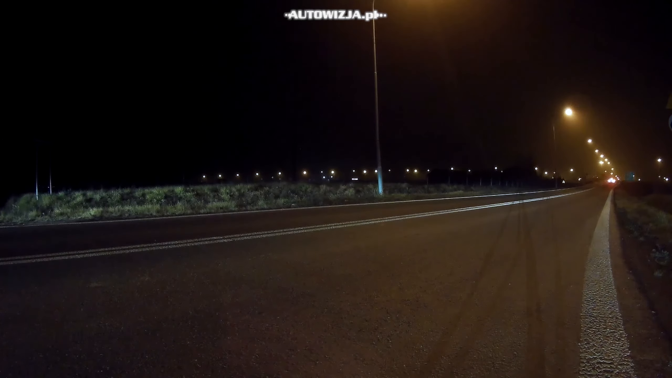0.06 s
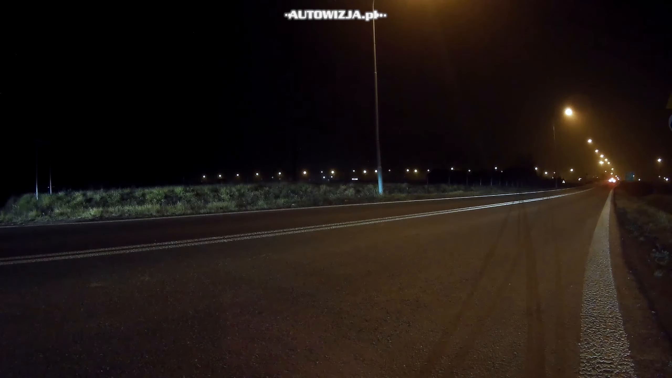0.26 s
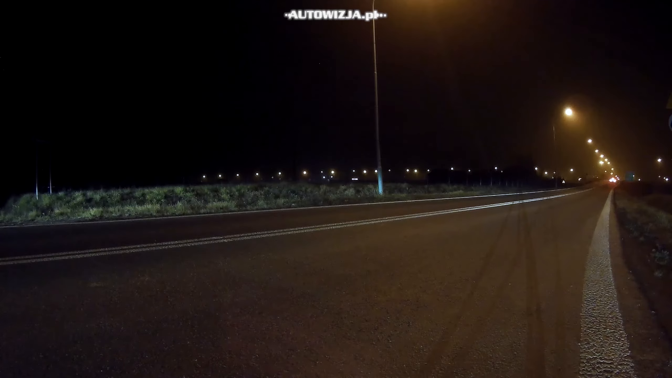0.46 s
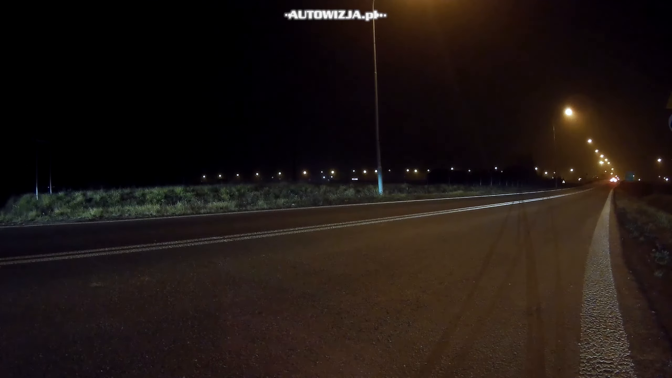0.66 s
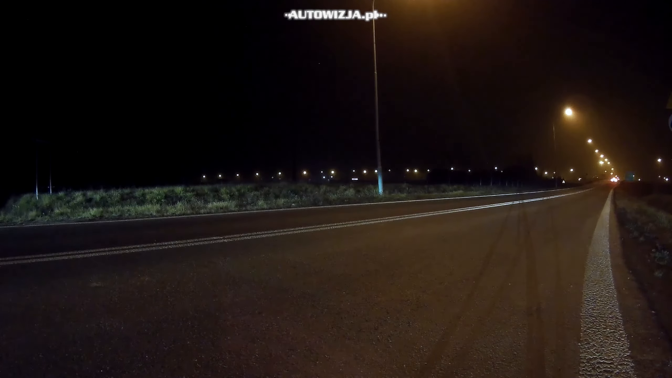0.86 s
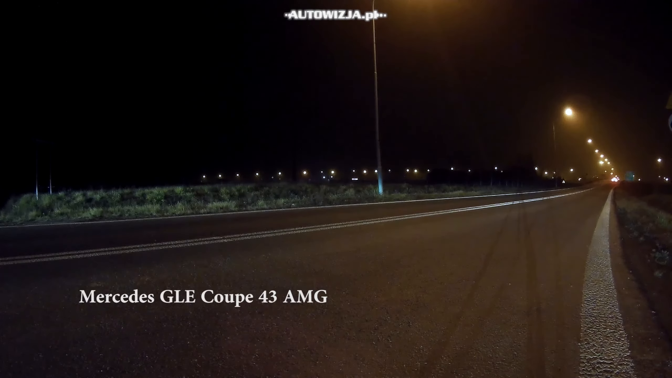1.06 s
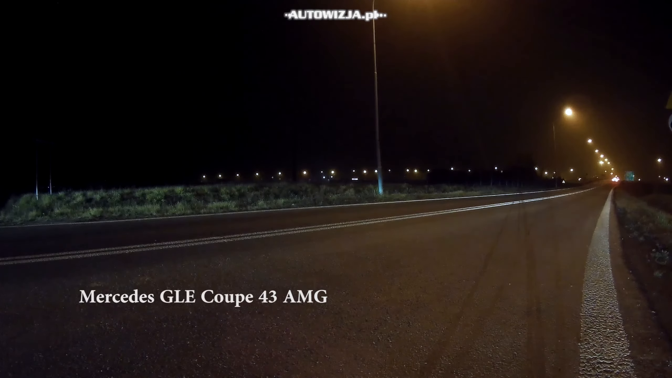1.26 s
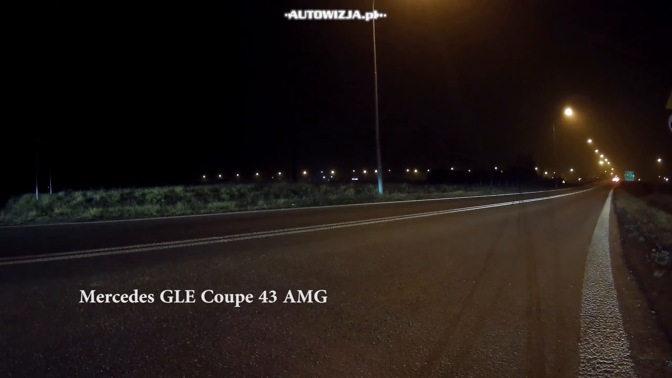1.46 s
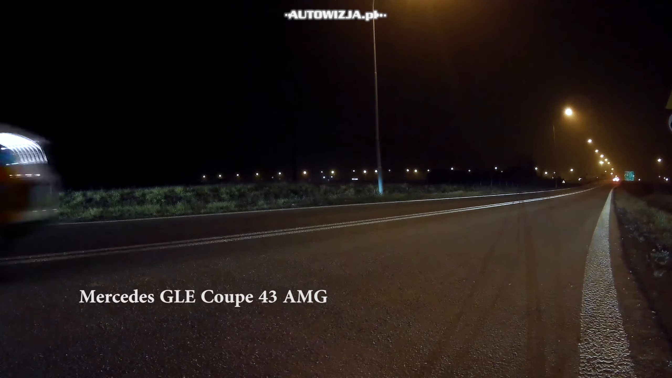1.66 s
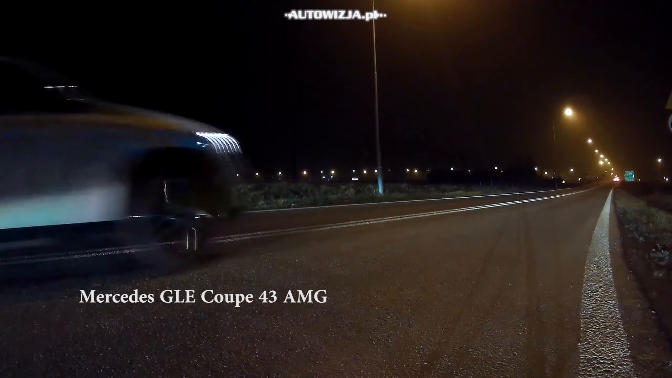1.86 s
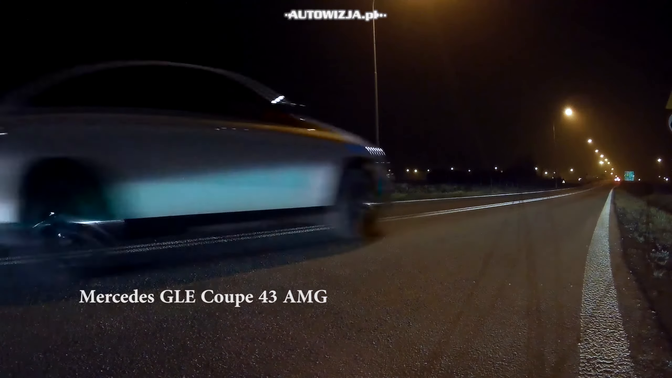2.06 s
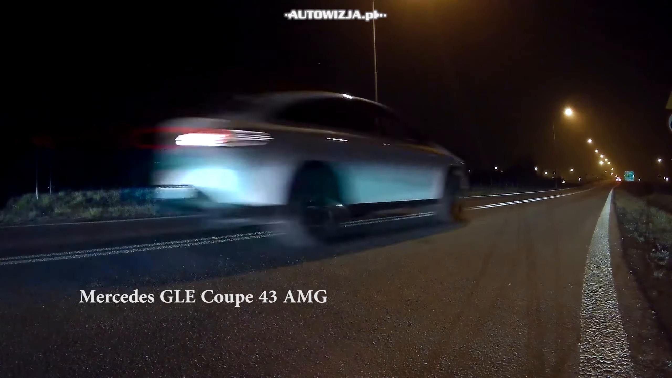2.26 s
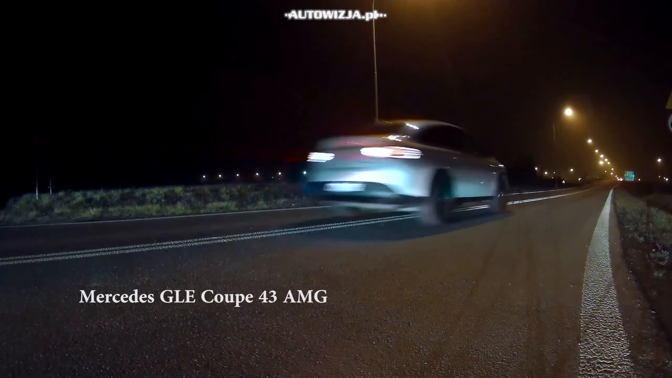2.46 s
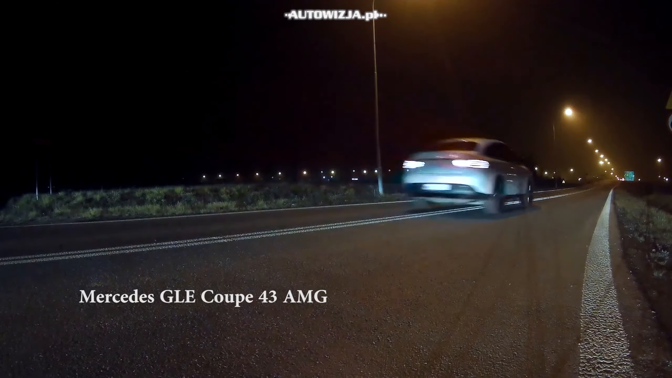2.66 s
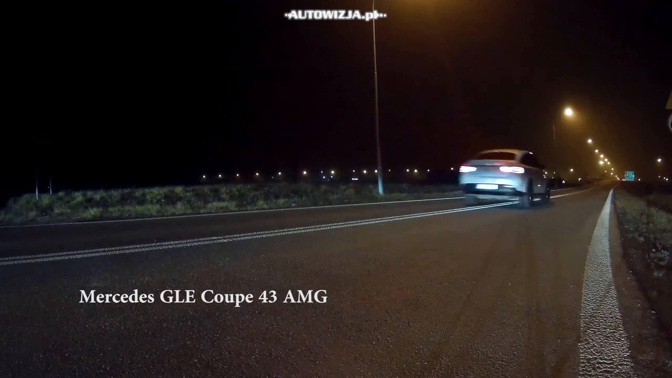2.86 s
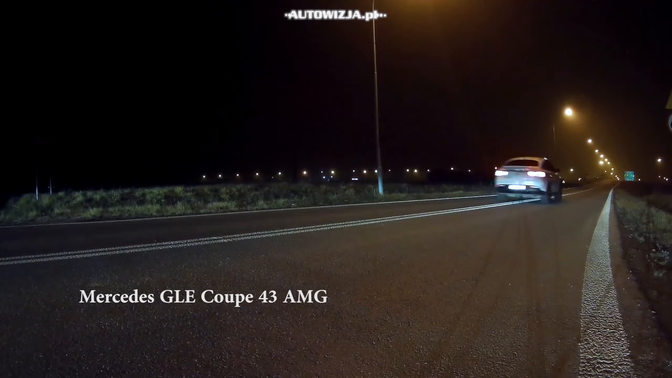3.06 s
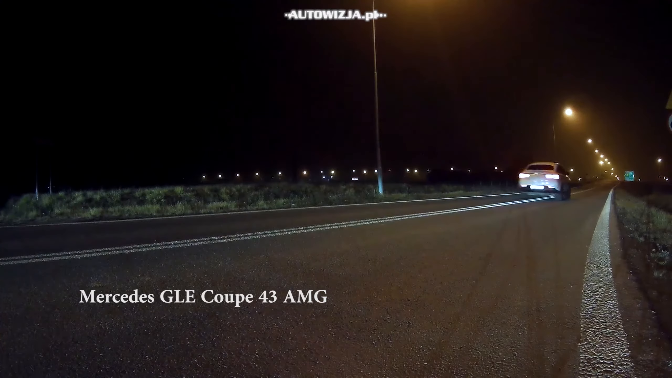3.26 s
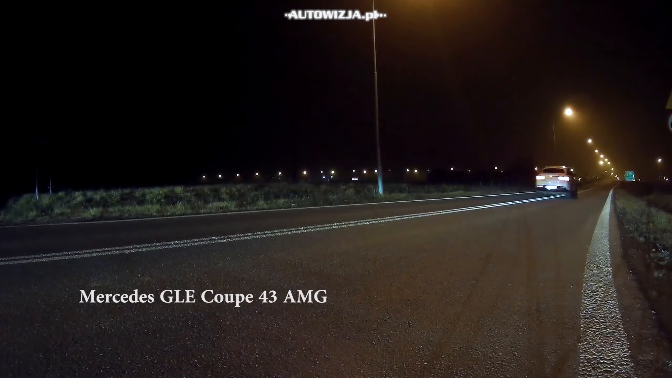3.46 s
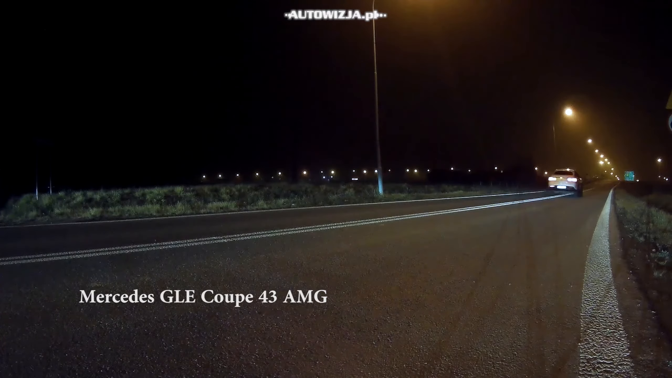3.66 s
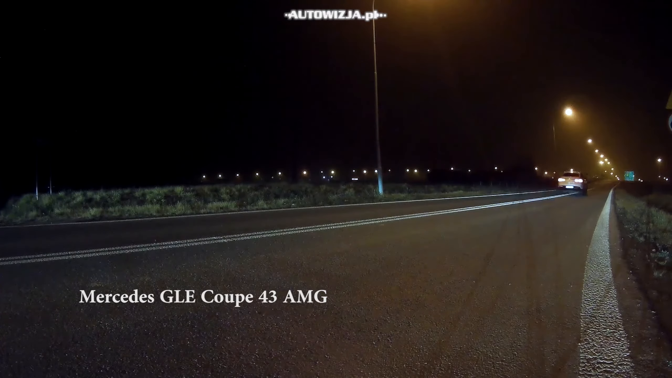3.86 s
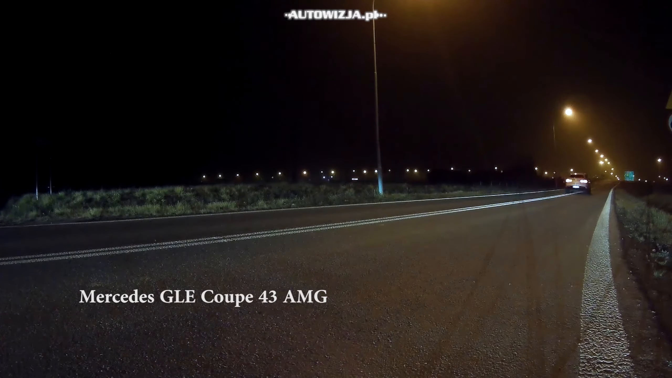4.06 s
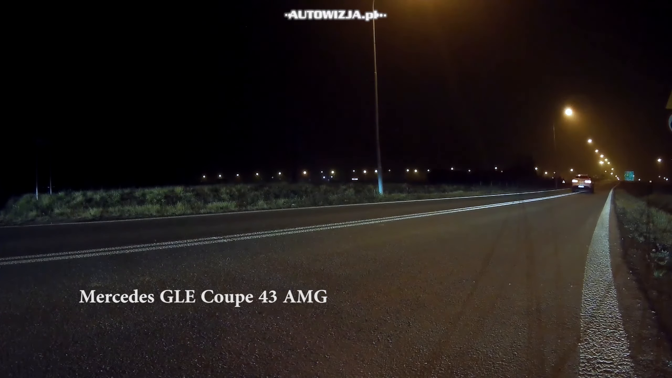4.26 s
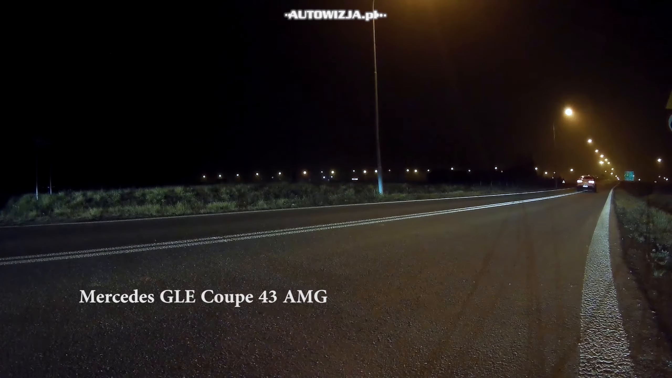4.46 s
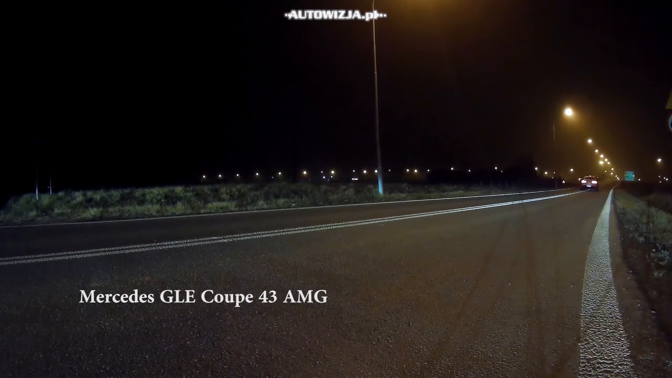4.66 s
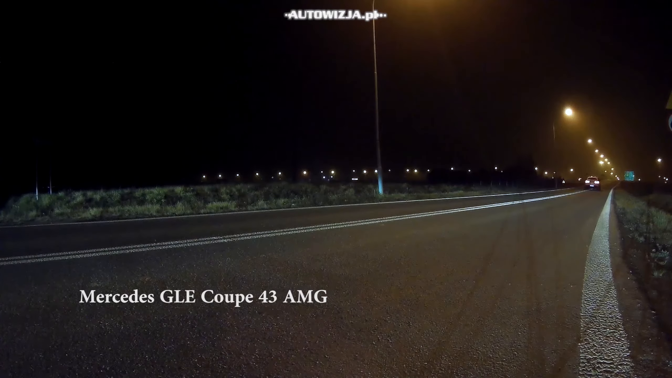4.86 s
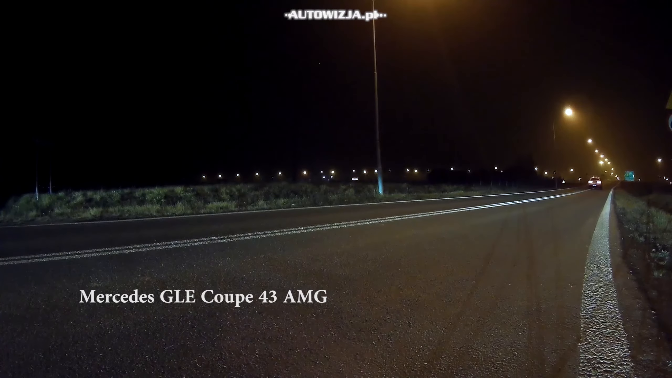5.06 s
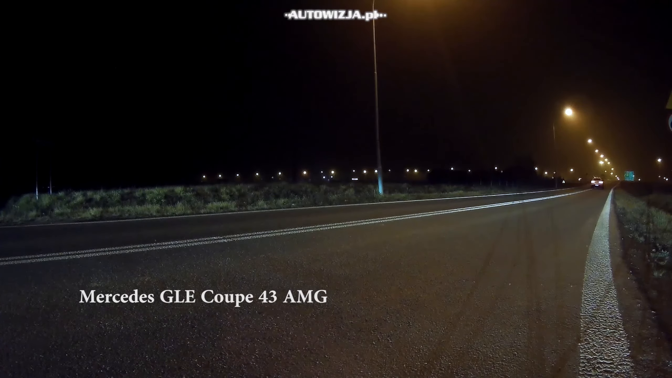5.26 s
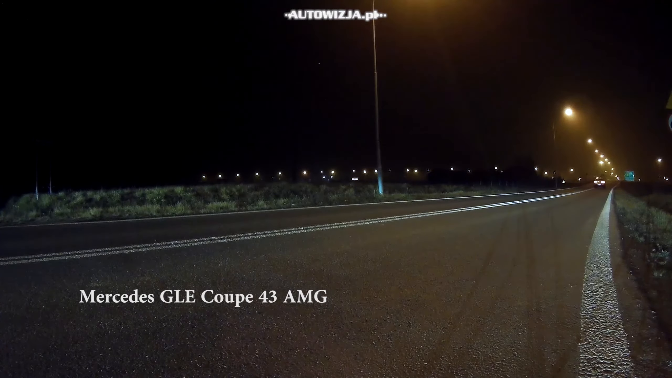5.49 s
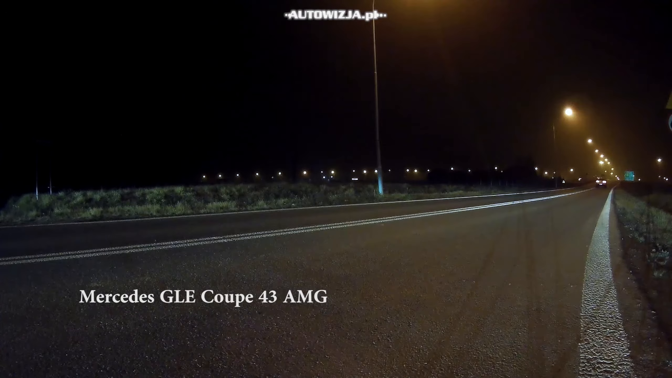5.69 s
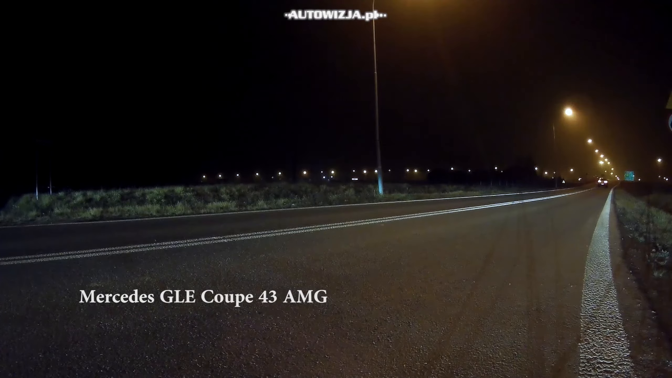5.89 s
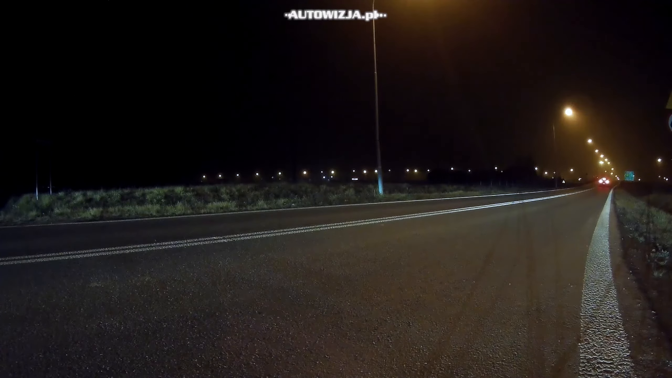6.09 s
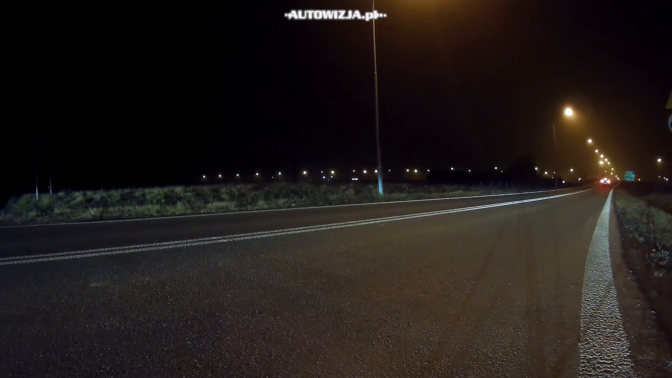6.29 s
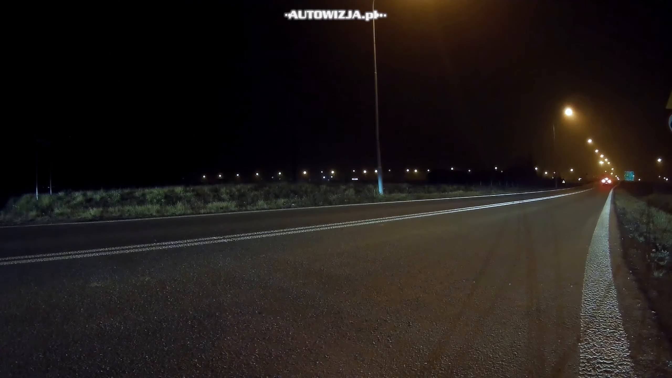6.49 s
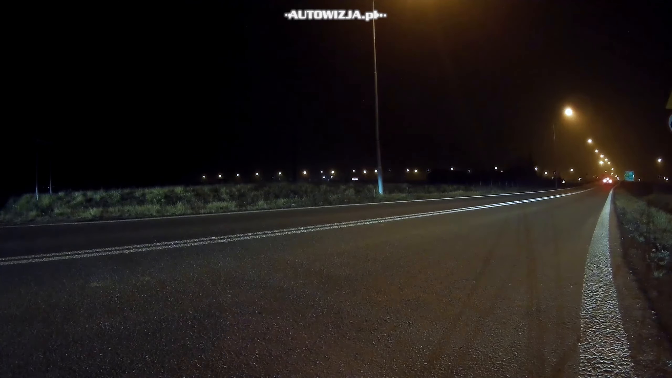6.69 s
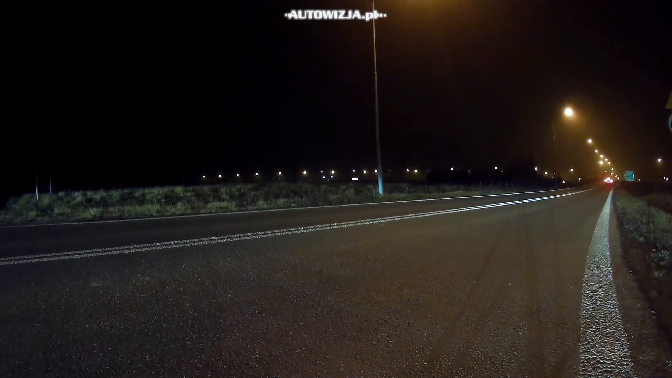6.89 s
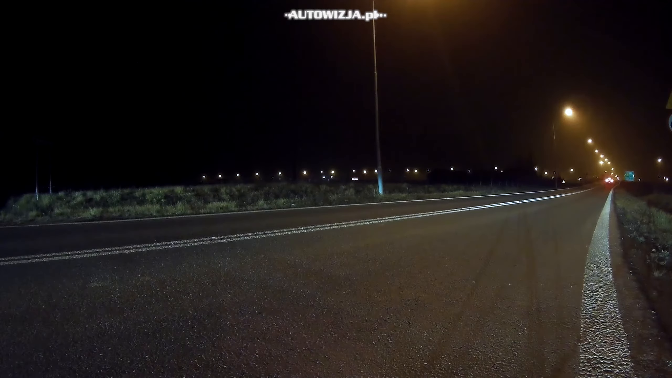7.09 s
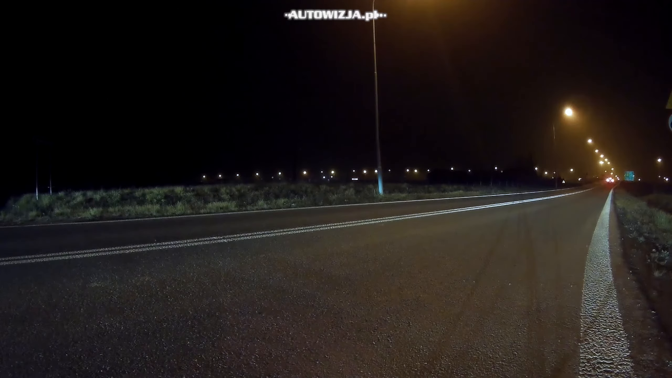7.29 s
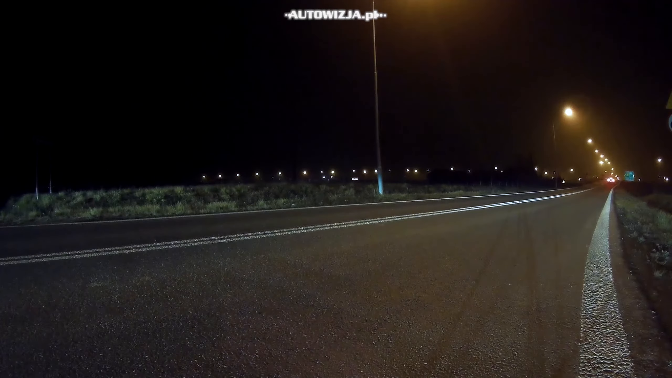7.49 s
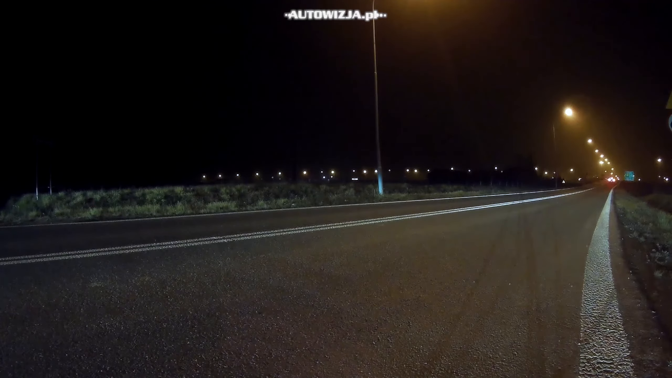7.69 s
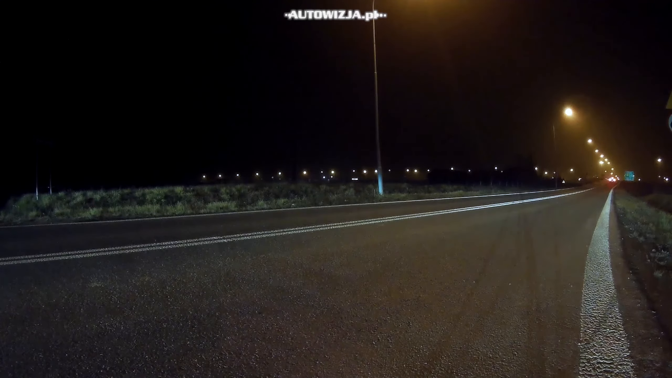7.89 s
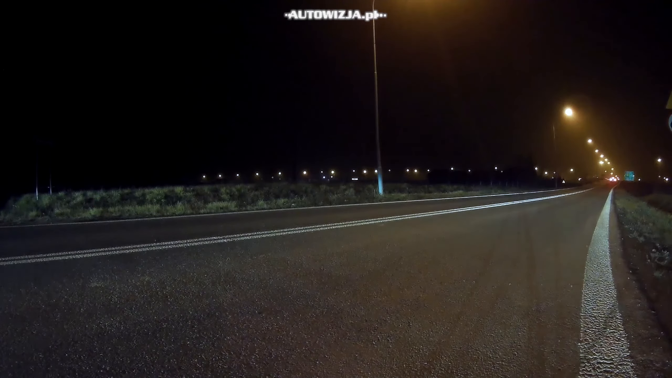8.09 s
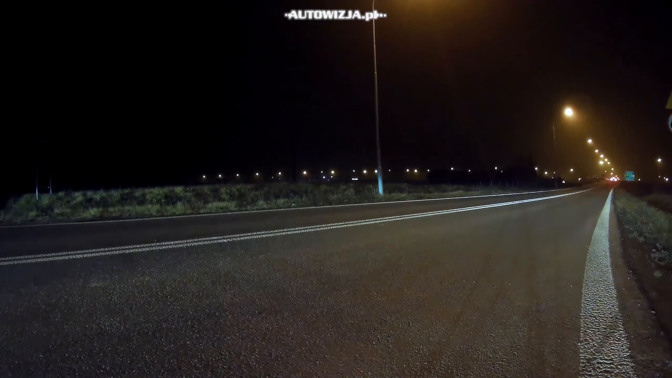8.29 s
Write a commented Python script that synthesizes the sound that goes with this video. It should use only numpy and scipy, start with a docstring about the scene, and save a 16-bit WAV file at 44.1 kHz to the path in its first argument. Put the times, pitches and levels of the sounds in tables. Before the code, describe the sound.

A hard-accelerating car approaches from quiet, its engine pitch sweeping upward, and passes very close with a burst of tyre noise and spray hiss. Sharp double crack at the first gearchange, deep throaty tail note afterward, heavier bangs at the second, then distant popping on lift-off. Faint idling hum, thin high electronic whine and dark night rumble remain as another engine gathers speed. Static outdoor microphone beside the road.

```python
"""A six-cylinder car accelerates hard past the listener at night and drives off through two upshifts.
Its exhaust is built from harmonics and filtered firing pulses; shocks and noise bursts crack at the shifts
and backfire on the lift-off. Coloured noise makes the tyres roar and hiss on the damp road.
Summed sines make a second car gathering speed from afar, an idling car, a coasting hum and a faint
electronic whine, over the noise rumble of the night."""
import sys
import numpy as np
from scipy import signal
from scipy.fft import rfft, irfft
from scipy.io import wavfile
from scipy.ndimage import uniform_filter1d

SR = 44100
rng = np.random.default_rng(int(sys.argv[2]) if len(sys.argv) > 2 else 0)


def put_to_file(sound):
    """Save the sound as 16-bit audio at rate SR, in the file named by the first command-line argument."""
    columns = np.atleast_2d(sound).T  # one column per channel
    safe = np.clip(columns, -1, 1)
    whole_steps = np.round(safe * 32767)
    wavfile.write(sys.argv[1], SR, whole_steps.astype(np.int16))


N = 367794
TIME = np.arange(N) / SR

# firing rate of the engine: (time [s], rate [Hz])
REVS = [(0.03, 71.5), (0.34, 80.7), (0.9, 111.0), (1.96, 256.3), (2.25, 294.7), (2.39, 300.2),
        (2.48, 295.8), (2.69, 212.8), (2.8, 209.4), (3.01, 225.1), (3.93, 274.9), (4.44, 292.1),
        (4.52, 285), (4.6, 239.8), (4.77, 223.1), (4.94, 217.1), (5.86, 242), (6.1, 238.0)]
# the six firings of one engine cycle: (relative strength [dB], lag through its manifold [s])
CYLINDERS = [(7, 0), (2.5, .00034), (-1, .00012), (-1, -.00018), (1, -.00027), (1, -0.0038)]
# colour of the rasp from the front and side: (frequency [Hz], relative level [dB])
FRONT = [(40, -30), (150, -8.5), (300, -2.5), (430, -5.5), (620, 4.5), (830, -3.5), (1000, -8),
         (1400, -14.5), (1800, -21), (2300, -9), (3000, -28.5), (3900, -16.5), (6000, -26), (14000, -70)]
# one pull per gear: (throttle opens [s], throttle closes [s], roughness [0-1], imbalance of the two banks [dB])
GEARS = [(-.5, 2.5, 0.35, -5.5), (2.68, 4.48, 0.13, -2.5), (4.62, 5.82, 0.59, -8.5)]
OPEN_S = 0.12  # how long the note takes to follow the opening throttle


def engine(note_db=-0.5, rasp_db=-2.5, overtone_db=-6, growl_db=-2, wander=0.00081):
    """One crankshaft drives note, overtones, growl and rasp; off throttle they turn quiet and rough."""
    # loudness at full throttle, before the trims: (time [s], note level [dB], rasp level [dB])
    full_throttle = [(0, -72, -55), (.45, -43, -40), (.8, -45, -38), (1.1, -40.5, -33), (1.35, -31, -22.5),
                     (1.6, -27, -23.5), (1.8, -26.5, -24.5), (2.05, -19, -17.5), (2.15, -21.5, -26.5),
                     (2.45, -24, -25.5), (2.85, -31, -23), (3.28, -29.5, -23.5), (3.4, -29.5, -23.5),
                     (3.62, -22.5, -19.5), (4.15, -30, -28.5), (4.45, -32.5, -24.5), (4.85, -30, -24.5),
                     (5.6, -33, -25), (5.8, -30.5, -22)]
    boost_s = 0.35  # the rasp waits for the boost to build
    shut_note_db, shut_rasp_db, shut_rough = -8, -12.5, 1  # with the throttle shut
    overrun_db_per_s = -41  # the exhaust dies away after the last pull
    hz, = curves(REVS)
    full_note_db, full_rasp_db = curves(full_throttle)
    gear_rough, imbalance_db = gear_character()
    shut = 1 - throttle(OPEN_S)
    slack = 1 - throttle(boost_s)
    rough = gear_rough + shut * (shut_rough - gear_rough)
    firings = np.cumsum(hz * (1 + wander * walk(14))) / SR  # running count

    upper = undb(rasp_db) * exhaust_rasp(firings, rough)
    upper += undb(overtone_db) * exhaust_overtones(firings, rough)
    upper += undb(growl_db) * growl(firings, rough)
    upper *= undb(full_rasp_db + shut_rasp_db * slack)
    note = exhaust_note(firings, hz, rough, imbalance_db)
    note *= undb(note_db + full_note_db + shut_note_db * shut)
    overrun = undb(overrun_db_per_s * np.maximum(TIME - GEARS[-1][1], 0))
    return overrun * (note + upper) + shift_thump(firings)


def throttle(attack_s, close_s=0.084):
    """Share 0-1 of full load: it builds in each gear and falls at the shift."""
    return sum(ramp(opens, attack_s) * (1 - ramp(closes, close_s)) for opens, closes, *_ in GEARS)


def gear_character():
    """Roughness and bank imbalance, held through each pull."""
    return curves([(s, *character) for opens, closes, *character in GEARS for s in (opens, closes)])


def exhaust_note(firings, hz, rough, imbalance_db, waver_db=1.5, flutter=0.16, dispersion=0.2504):
    """Low harmonics of the two banks sweep through pipe resonances and form one thump every two firings."""
    # resonances heard from ahead of, beside and behind the car: (frequency [Hz], relative level [dB])
    pipe_ahead = [(59, -11), (131, -2), (203, -3.5), (262, -5), (320, 7), (365, 10.5), (423, -2.5),
                  (500, 5), (560, -6), (622, 9.5), (680, -4), (735, 10)]
    pipe_beside = [(100, -24), (146, -6), (228, -13), (255, 0), (300, -3), (421, -4.5), (491, -7), (597, 2),
                   (680, -4), (735, 5), (777, -6), (815, 3), (850, -7), (901, -11)]
    pipe_behind = [(120, -27), (172, -18), (230, -5.5), (280, 0.5), (318, 12), (350, 1), (380, -1.5),
                   (408, -18), (440, -1), (465, 0.5), (490, -5.5), (520, -1.5), (582, 13), (637, 2),
                   (715, 6), (785, -3), (860, -14)]
    # the side and then the tail swing into view
    beside_s, behind_s, swing_s = 1.61, 2.49, 0.38
    # around the pass the harmonics swell and fade one by one
    swim_db, swim_s = 3, 0.66
    beside = ramp(beside_s, swing_s)
    astern = ramp(behind_s, swing_s)
    close = np.exp(-((TIME - beside_s) / swim_s) ** 2 / 2)
    aspects = ((1 - beside, pipe_ahead), (beside - astern, pipe_beside), (astern, pipe_behind))
    out = 0
    for k in range(1, 7):
        db = sum(share * response(pipe, k * hz / 2) for share, pipe in aspects)
        db += k % 2 * imbalance_db  # odd harmonics are the difference between the banks
        db += waver_db * rough * walk(35)
        db += swim_db * close * np.tanh(walk(14))
        phase = np.pi * k * firings - dispersion * k ** 2 + flutter * rough * walk(50)
        out = out - undb(db) * np.sqrt(2) * np.cos(phase)
    return out


def exhaust_rasp(firings, rough, scatter_db=7, jitter_s=0.00025, edge_hz=800, gas=0.85, puff=0.35):
    """Unequal, unevenly spaced firings ring the pipes, and a puff of gas follows each."""
    # colour straight behind the tailpipes: (frequency [Hz], relative level [dB])
    rear_colour = [(70, -33), (150, -17), (300, -9.5), (480, 2.5), (700, 1), (1050, -1.5), (1550, -3),
                   (1800, -16), (2150, -9), (2550, -13.5), (3000, -31), (3900, -21.5), (4900, -38),
                   (8300, -31), (13000, -82)]
    index = np.arange(1, int(firings[-1]))
    times = np.interp(index, firings, TIME)
    strength_db, lag = np.array(CYLINDERS)[index % len(CYLINDERS)].T
    chance = np.tanh(rng.standard_normal((len(index), 2))).T * np.interp(times, TIME, rough)
    sizes = undb(strength_db + scatter_db * chance[0])
    sizes /= np.sqrt(uniform_filter1d(sizes ** 2, size=48))  # evens out the running power
    train = pulses(times + lag + jitter_s * chance[1], sizes)

    # the low part of the even beat is the note; what differs between cylinders fills the gaps between its lines
    beat = pulses(times, np.full(len(times), sizes.mean()))
    train -= signal.sosfiltfilt(signal.butter(4, edge_hz, fs=SR, output="sos"), beat)

    # puff is the decay as a share of the firing interval
    puff_shape = np.exp(-(firings % 1) / puff)
    puffs = unit(noise() * puff_shape * np.interp(np.floor(firings), index, sizes))
    gasflow = unit(train) + gas * rough * puffs
    rear = behind(TIME, turn_s=0.95)
    sound = (1 - rear) * unit(colour(gasflow, FRONT)) + rear * unit(colour(gasflow, rear_colour))
    return unit(verge(sound, share=1.0, decay_s=0.025))


def exhaust_overtones(firings, rough, slope_db=-2, waver_db=4, flutter=0.28):
    """Higher bank harmonics beam out of the tailpipes, each wavering slowly in level."""
    out = 0
    for step, k in enumerate(range(7, 13)):
        phase = np.pi * k * firings + flutter * rough * walk(50) + rng.uniform(0, 2 * np.pi)
        out = out + undb(slope_db * step + waver_db * walk(7)) * np.sin(phase)
    return unit(out) * behind(TIME, turn_s=1.0) * np.clip(1 - rough, 0, 1)


def growl(firings, rough, waver_db=4.5, flutter=0.5):
    """Multiples of the engine cycle, mostly between the bank harmonics, heard from the front and side."""
    hz, = curves(REVS)
    points_hz, points_db = np.transpose(FRONT)
    out = 0
    for k in (7, 8, 10, 11, 13, 14, 16, 17, 19, 20, 21, 22, 26, 28):
        db = np.interp(k * hz / len(CYLINDERS), points_hz, points_db) + waver_db * walk(8.86)
        phase = 2 * np.pi * k * firings / len(CYLINDERS)
        phase += flutter * rough * walk(50.6) + rng.uniform(0, 2 * np.pi)
        out = out + undb(db) * np.sin(phase)
    return unit(out) * (1 - behind(TIME, turn_s=0.52))


def shift_thump(firings, thump_db=-38, fade_s=0.08):
    """With the ignition cut for an upshift the engine runs lumpy: one soft thump every two firings."""
    shifting = (1 - throttle(OPEN_S)) * (1 - ramp(GEARS[-1][0], fade_s))
    return undb(thump_db) * shifting * np.sqrt(2) * np.cos(np.pi * firings)


def explosions(scatter_db=2.5, unevenness=0.25, pop_gap_s=0.0085):
    """Rows of the cracks, where unburnt fuel explodes in the exhaust, and of each upshift's uneven pops."""
    # cracks placed one by one: (time [s], relative bang level [dB], relative snap level [dB])
    placed_cracks = [(2.459, -36, -29.5), (2.5064, -20, -20), (2.513, -16.5, -14), (2.6931, -16.5, -36.5),
                     (4.4689, -14.5, -34), (4.4842, -9.5, -19), (4.495, -14, -26), (4.5066, -13, -28),
                     (4.5289, -13.5, -26), (4.6654, -7, -30), (4.7263, -24, -46), (5.0265, -29, -52),
                     (5.7829, -12, -50), (5.8094, -21, -59), (6.1811, -11, -19), (6.1948, -12, -25),
                     (6.2766, -11, -23.5), (6.324, -14, -17), (6.3612, -15, -33), (6.3795, -19.5, -51),
                     (6.418, -30, -39)]
    # a run of uneven pops while the ignition is cut for an upshift:
    # (start [s], length [s], relative bang level [dB], relative snap level [dB], growth of the snap [dB])
    shift_crackle = [(2.477, .1, -25.5, -28.5, 8), (4.503, .05, -19.5, -25, -7)]
    rows = list(placed_cracks)
    for start_s, length_s, bang_db, snap_db, growth_db in shift_crackle:
        for k, (early, bang, snap) in enumerate(rng.standard_normal(size=(16, 3))):
            age = k * pop_gap_s
            if age <= length_s:
                pop_s = start_s + age + unevenness * pop_gap_s * early
                pop_snap_db = snap_db + growth_db * age / length_s + scatter_db * snap
                rows.append((pop_s, bang_db + scatter_db * bang, pop_snap_db))
    return np.array(rows)


def backfires(cracks, bang_db=23, snap_db=22, far_snap_db=21, echo_db=-12, echo_s=0.073):
    """Explosions boom in the tailpipe and snap at its mouth; distance dulls the snap and draws out its echo."""
    # colours of the boom, the snap close by and the snap far down the road:
    # (frequency [Hz], relative level [dB])
    bang_colour = [(50, -22), (200, -20.5), (315, 0.5), (410, -10.5), (565, 9), (760, 1), (1000, 1.5),
                   (1400, -3.5), (1800, -15.5), (2300, -14), (3000, -26.5), (6000, -69)]
    near_colour = [(1000, -18), (2400, -15), (3000, -9.5), (3500, 3), (4800, -1), (5900, 4.5), (7400, -1),
                   (8800, 7), (10000, 3.5), (11500, -3), (13000, -6), (15000, -11)]
    far_colour = [(1000, -24), (2400, 11), (3000, -4.5), (4050, 12), (4700, -4), (5600, 9), (6700, -1),
                  (8200, 4), (10000, -13), (15500, -20)]
    times, bangs, snaps = cracks.T
    far = behind(times, turn_s=2.47)
    bang_gains = undb(bangs + bang_db)
    near_gains = undb(snaps + snap_db) * (1 - far)
    far_gains = undb(snaps + far_snap_db) * far
    bang = blast(times, bang_gains, burst_s=0.0038, burst=0.67, tail_s=0.03, tail=0.3)
    near_snap = blast(times, near_gains, burst_s=0.00087, burst=1.14, tail_s=0.0098, tail=0.92)
    far_snap = blast(times, far_gains, burst_s=0.0026, burst=1.4, tail_s=0.0089, tail=0.35)

    age = TIME[:SR // 2]
    roadside = noise()[:len(age)] * np.exp(-age / echo_s)
    echo = signal.fftconvolve(far_snap, roadside / np.linalg.norm(roadside))[:N]
    far_snap = far_snap + undb(echo_db) * echo
    return -colour(bang, bang_colour) - colour(near_snap, near_colour) - colour(far_snap, far_colour)


def thuds(cracks, thud_db=11):
    """Close by, each explosion also pushes out a low slug of air."""
    # (frequency [Hz], relative level [dB])
    thud_colour = [(20, -11), (42, 5), (90, -3), (150, -9), (300, -21), (1000, -54)]
    times, bangs, _ = cracks.T
    gains = undb(bangs + thud_db) * (1 - behind(times, turn_s=2.15))
    return colour(blast(times, gains, burst_s=0.006, burst=0.42, tail_s=0.025, tail=0.47), thud_colour)


def blast(times, gains, burst_s, burst, tail_s, tail):
    """A shock front at each crack, a burst of turbulent gas, and scatter from the roadside."""
    age = TIME[:SR // 2]
    shocks = pulses(np.round(times * SR) / SR, gains)  # on whole samples, so the fronts stay sharp
    parts = ((burst_s, burst), (tail_s, tail))
    spread = sum(share ** 2 * np.exp(-age / s) / (s * SR) for s, share in parts)
    power = np.abs(signal.fftconvolve(shocks ** 2, spread)[:N])
    return shocks + noise() * np.sqrt(power)


def tyres(far_spray_db=-56, flicker_db=1.0, patch_db=0.88):
    """Tread roar, body rumble and spray, near and far, each flickering with the patches of the road."""
    # tyres far down the road: (time [s], tread roar level [dB], low rumble level [dB])
    distant_tyres = [(0, -33.5, -58), (.8, -40.5, -35), (2.2, -40, -50), (2.8, -28, -32.5), (3.6, -36, -36),
                     (5, -25.5, -35.5), (6, -26.5, -41), (6.5, -30, -43), (8.34, -36, -47)]
    # colours: (frequency [Hz], relative level [dB])
    tread_colour = [(150, -28), (400, -20), (650, -3), (850, -1.5), (1100, -5.5), (1500, -14.5),
                    (2000, -20), (2500, -25.5), (3000, -44), (4000, -34), (8000, -52)]
    rumble_colour = [(25, -26), (70, -24.5), (150, -12), (300, -1.5), (450, 2.5), (620, 0), (900, -18),
                     (1800, -22), (4000, -43)]
    spray_colour = [(1000, -8.5), (1700, 1), (2300, 5), (3000, -20), (3700, -3.5), (4700, -6), (6400, 3),
                    (7800, -2.5), (9100, 6), (10500, -1.5), (12500, -6.5), (15500, -7)]
    far_tread_db, far_rumble_db = curves(distant_tyres)
    # near and far gains add in power
    tread_gain = np.hypot(passing(peak_db=-23.0, width_s=0.32, shadow_db=-3), undb(far_tread_db))
    rumble_gain = np.hypot(passing(peak_db=-24, width_s=0.44, shadow_db=-14), undb(far_rumble_db))
    spray_gain = np.hypot(passing(peak_db=-23, width_s=0.39, shadow_db=-6), undb(far_spray_db))
    tread = colour(noise(), tread_colour) * tread_gain * undb(flicker_db * walk(30))
    rumble = colour(noise(), rumble_colour) * rumble_gain * undb(flicker_db * walk(25))
    spray = colour(noise(), spray_colour) * spray_gain * undb(patch_db * walk(40))
    return tread + rumble + road_bounce(spray)


def passing(peak_db, width_s, shadow_db, shadow_after_s=0.45, shadow_s=0.29):
    """Gain of a tyre sound that swells as each car nears, then is shadowed by the body once it has gone by."""
    # tyres coming by: (loudest at [s], relative level [dB])
    passes = [(1.55, 0), (8.9, 0)]
    gain = 0
    for s, db in passes:
        shadow = shadow_db * ramp(s + shadow_after_s, shadow_s)
        gain = gain + undb(peak_db + db + shadow) / (1 + ((TIME - s) / width_s) ** 2)
    return gain


def road_bounce(x, lag_s=0.0008, nearest_s=1.444, width_s=0.55, share=0.14):
    """An asphalt reflection lags most when the tyres are nearest, so a comb sweeps through the hiss."""
    nearness = 1 / np.hypot(1, (TIME - nearest_s) / width_s)
    return x + share * nearness * np.interp(TIME - lag_s * nearness, TIME, x)


def second_car(waver_db=1, fade_in_s=0.34):
    """Harmonics of the firing rate rise through the pipe resonances as a drone."""
    # (time [s], firing rate [Hz], relative level [dB])
    next_car = [(6.4, 43, -58), (6.76, 49.03, -50), (7.3, 63.64, -39), (7.6, 69.7, -41), (8.05, 82.4, -39),
                (8.34, 100.6, -42)]
    # pipe resonances: (frequency [Hz], relative level [dB])
    next_pipe = [(45, -10), (55, -7), (66, 1), (80, -4), (97, -9), (109, 1), (125, -13), (160, -14),
                 (195, -1.5), (220, -10), (250, -6.5), (330, -11.5), (600, -16)]
    hz, level_db = curves(next_car)
    phase = 2 * np.pi * np.cumsum(hz * (1 + 0.0035 * walk(15))) / SR
    drone = 0
    for k in range(1, 8):
        db = level_db + response(next_pipe, k * hz) + waver_db * walk(9.1)
        drone = drone + undb(db) * np.sin(k * phase + rng.uniform(0, 2 * np.pi))
    return np.sqrt(2) * drone * ramp(next_car[0][0], fade_in_s)


def idling_car(idle_hz=73, waver_db=1):
    """The hum of a car idling nearby: one sine wandering in pitch and level."""
    # (time [s], level [dB])
    idle_level = [(0, -54), (1, -66), (2.2, -63), (2.8, -53), (3.6, -48.5), (5, -51.5), (6.5, -51.5),
                  (8.34, -53)]
    idle_db, = curves(idle_level)
    phase = 2 * np.pi * np.cumsum(idle_hz * (1 + 0.0147 * walk(5))) / SR
    return np.sqrt(2) * undb(idle_db + waver_db * walk(3.9)) * np.sin(phase)


def coasting(upper_ratio=1.083, waver_db=1.0):
    """Drivetrain hum of the car coasting away: two neighbouring tones sink as it slows."""
    # (time [s], lower tone [Hz], level of each tone [dB])
    coast = [(5.8, 482.8, -52.5), (6, 478, -46), (6.5, 469, -43), (6.95, 452.6, -46.5), (7.4, 441, -67)]
    hz, db = curves(coast)
    phase = 2 * np.pi * np.cumsum(hz) / SR
    tones = sum(undb(db + waver_db * walk(13)) * np.sin(k * phase) for k in (1, upper_ratio))
    return np.sqrt(2) * tones


def whine(whine_hz=13715, octave_below_db=-9):
    """A thin electronic tone with a weaker one an octave below."""
    # (time [s], level of the upper tone [dB])
    whine_level = [(0, -54), (.8, -55), (2.6, -78), (3.3, -64), (4.4, -61), (5, -53), (8.34, -52.5)]
    db, = curves(whine_level)
    phase = 2 * np.pi * whine_hz * TIME
    return np.sqrt(2) * undb(db) * (np.sin(phase) + undb(octave_below_db) * np.sin(phase / 2))


def night_rumble(night_db=-49):
    """Steady noise, coloured dark: the faint rumble of the night."""
    # (frequency [Hz], relative level [dB])
    night_colour = [(20, -23), (38, 0), (70, -3.5), (110, -4), (300, -9), (1000, -22), (3000, -26),
                    (9000, -26), (14000, -51)]
    return undb(night_db) * colour(noise(), night_colour)


def behind(t, turn_s, pass_s=1.82):
    """Share 0-1 that grows after the pass as the tailpipes come to point back at the listener."""
    return 1 - np.exp(-(np.maximum(t - pass_s, 0) / turn_s) ** 2)


def verge(x, share, decay_s):
    """Grass, posts and kerbs scatter a short diffuse echo, whose share grows with distance."""
    age = TIME[:SR // 6]
    tail = noise()[:len(age)] * np.exp(-age / decay_s)
    wet = np.clip(share, 0, 1) * (0.5 + 0.5 * behind(TIME, turn_s=2))
    echo = signal.fftconvolve(x, tail / np.linalg.norm(tail))[:N]
    return (x + wet * echo) / np.sqrt(1 + wet ** 2)


def undb(db):
    """Decibels to gain."""
    return 10 ** (np.asarray(db) / 20)


def unit(x):
    """Scale to an rms of 1."""
    return x / np.sqrt(np.mean(x ** 2))


def curves(table):
    """Each column of a table joined by straight lines in time."""
    s, *columns = np.transpose(table)
    return [np.interp(TIME, s, c) for c in columns]


def ramp(start_s, length_s):
    """A straight rise from 0 to 1."""
    return np.clip((TIME - start_s) / length_s, 0, 1)


def noise():
    """White noise of rms near 1."""
    return rng.standard_normal(N)


def walk(rate):
    """Random levels, `rate` of them a second, smoothed twice and scaled to an rms of 1."""
    k = int(SR / rate)
    steps = np.repeat(noise()[:N // k + 1], k)
    return unit(uniform_filter1d(uniform_filter1d(steps, k), k)[:N])


def pulses(times, sizes):
    """Clicks, each shared between its two neighbouring samples."""
    at = np.clip(times * SR, 0, N - 2)
    i = at.astype(int)
    return np.bincount(i, sizes * (1 - at + i), N) + np.bincount(i + 1, sizes * (at - i), N)


def response(points, hz):
    """Level in dB of a (Hz, dB) spectrum at the given frequencies."""
    points_hz, points_db = np.transpose(points)
    return np.interp(np.log(hz), np.log(points_hz), points_db)


def colour(x, points, size=4096):
    """Causal minimum-phase filter of unit energy through (Hz, dB) points."""
    grid = np.maximum(np.arange(size // 2 + 1) * SR / size, 1)
    cepstrum = irfft(np.log(undb(response(points, grid))))
    # folding the cepstrum forward in time makes the filter causal
    cepstrum[1:size // 2] *= 2
    cepstrum[size // 2 + 1:] = 0
    impulse = irfft(np.exp(rfft(cepstrum)))
    return signal.fftconvolve(x, impulse / np.linalg.norm(impulse))[:N]


def scene():
    """All the cars and the whine over the faint rumble of the night."""
    cracks = explosions()
    main_car = engine() + backfires(cracks) + thuds(cracks) + coasting()
    others = second_car() + idling_car()
    return (main_car + tyres() + others + whine() + night_rumble())[None]


def record(dry, top_hz=15900):
    """Peaks beyond full scale overload the input and are clipped; the top of the treble is cut."""
    lowpass = signal.ellip(10, 0.2, 70, top_hz, fs=SR, output="sos")
    return signal.sosfilt(lowpass, np.clip(dry, -1, 1))


dry = scene()
out = record(dry)
put_to_file(out)
```